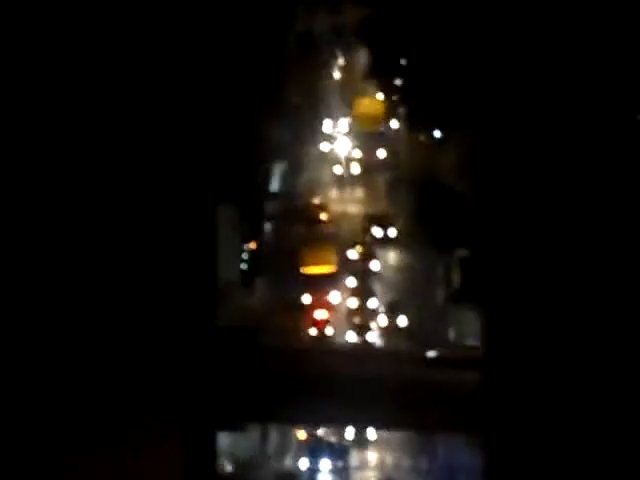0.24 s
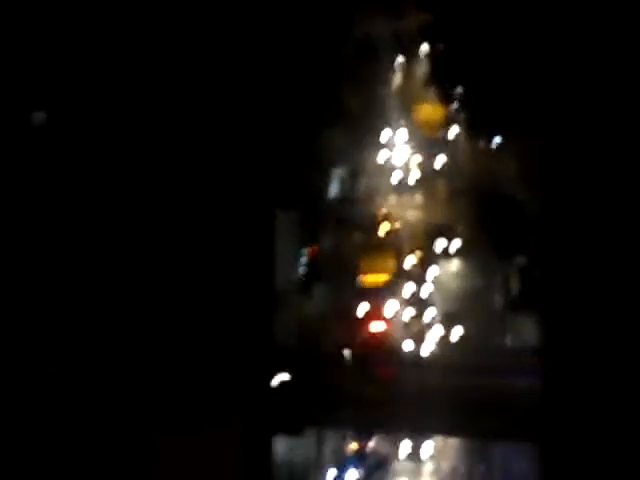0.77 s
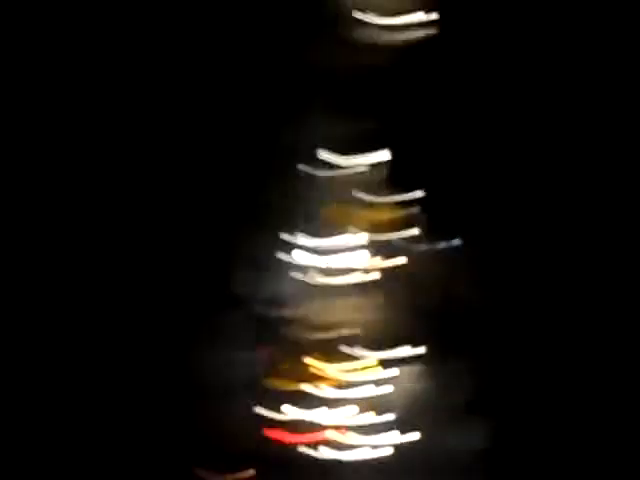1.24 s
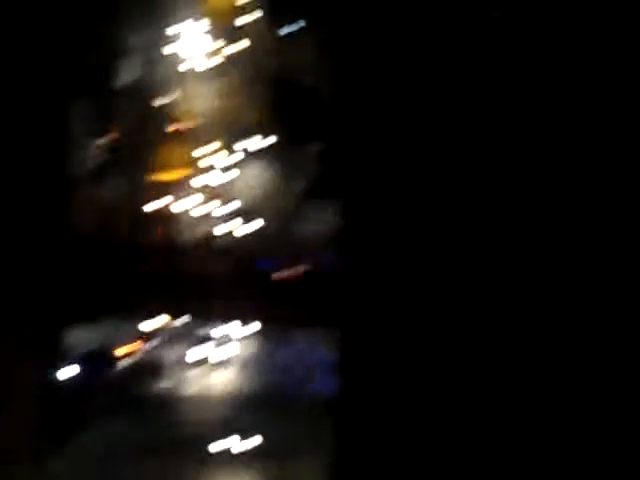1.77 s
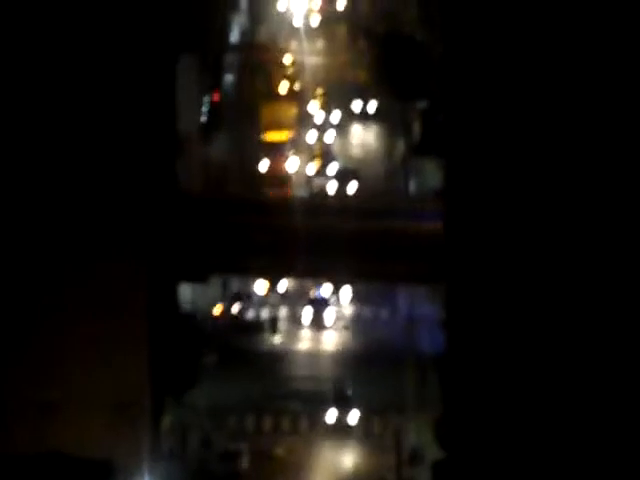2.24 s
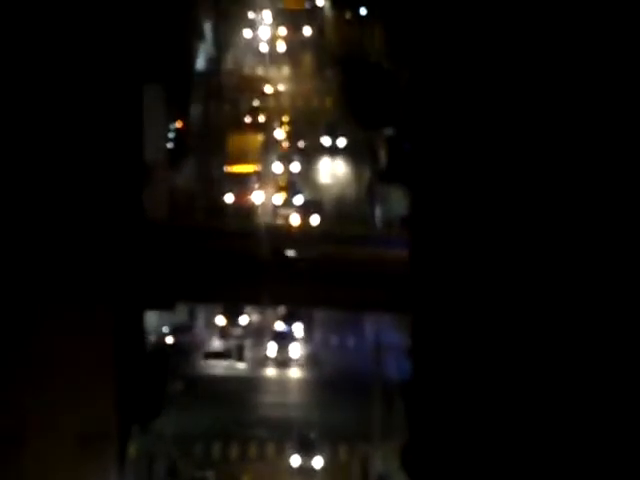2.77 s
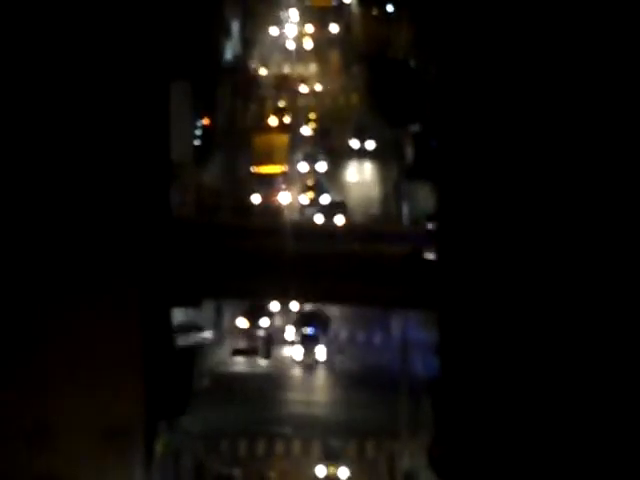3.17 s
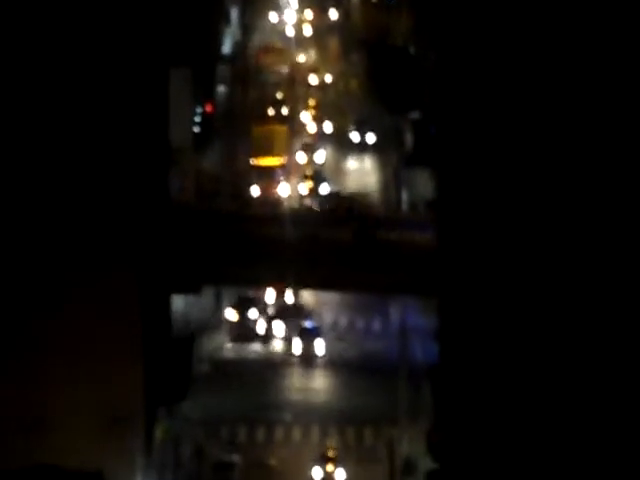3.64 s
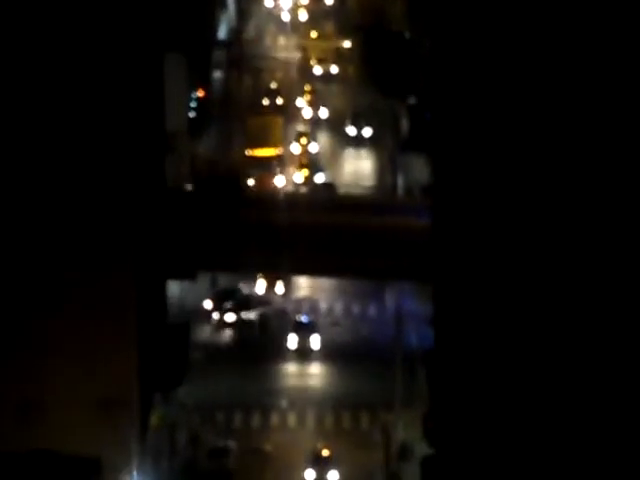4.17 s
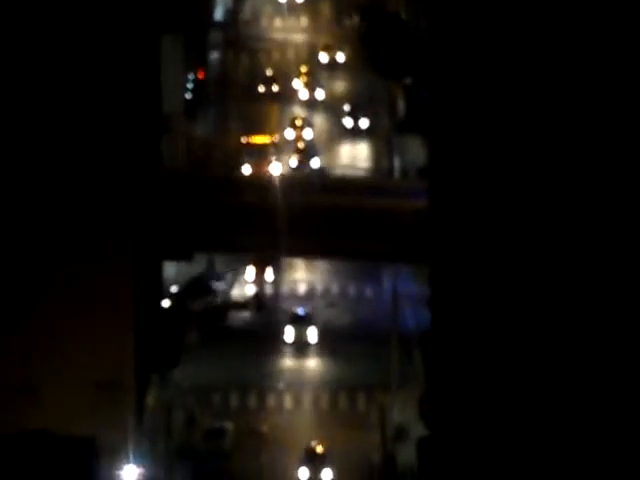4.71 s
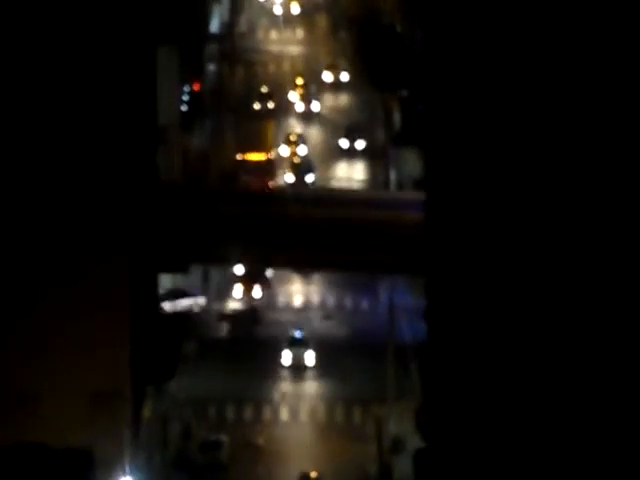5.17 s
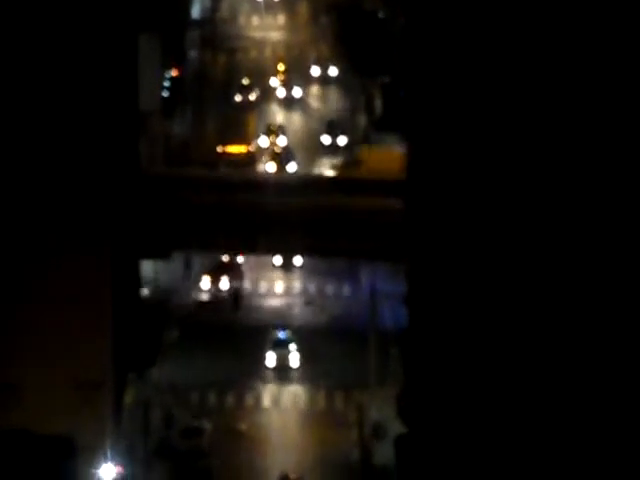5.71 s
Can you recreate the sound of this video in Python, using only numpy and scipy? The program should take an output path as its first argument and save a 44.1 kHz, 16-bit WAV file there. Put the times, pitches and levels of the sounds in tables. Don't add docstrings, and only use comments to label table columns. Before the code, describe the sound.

A hand thumps and jostles the camera for two seconds, then far-off traffic rumbles softly below with occasional clicks and knocks.

```python
import sys
import numpy as np
from scipy import signal
from scipy.fft import rfft, irfft, next_fast_len
from scipy.io import wavfile
from scipy.ndimage import uniform_filter1d, map_coordinates

SR = 44100
rng = np.random.default_rng(int(sys.argv[2]) if len(sys.argv) > 2 else 0)


def generate_wav(sig):
    pcm = np.round(np.clip(np.atleast_2d(sig).T, -1, 1) * 32767).astype(np.int16)
    wavfile.write(sys.argv[1], SR, pcm)


def boost(x):
    u = np.asarray(x, float) / 20
    return 10 ** u


N = 261938

# pitch_hz, level_db (per Hz)
SWAY_SPECTRUM = [(1, -44), (3, -4.5), (12, 4.5), (22, 2), (40, -15.5), (70, -11.5), (140, -120)]
# pitch_hz, level_db (per Hz)
RUMBLE_SPECTRUM = [(12, -30), (22, -3), (32, -1), (46, -3), (70, -4), (100, -5), (160, -11), (220, -28),
                   (370, -120)]
# pitch_hz, level_db (per Hz)
BODY_SPECTRUM = [(70, -34), (140, -2.5), (220, -7.5), (330, -10.5), (420, -11.5), (600, -23.5),
                 (1000, -48.5), (2000, -120)]
# pitch_hz, level_db (per Hz)
TYRE_SPECTRUM = [(350, -15), (600, -2.5), (826, 1.5), (1070, -4.5), (1160, -5), (1900, -14.5),
                 (2500, -22.5), (5000, -35.5), (6500, -99), (11000, -120)]
# pitch_hz, level_db, width_hz
ENGINE_DRONES = [
    (60.6, -37.5, 11.8),
    (90, -42, 13.5),
    (152.8, -49, 18),
    (268.5, -50, 36.5),
    (547.8, -60.5, 12),
]
# time_s, level_db
STREET_LEVEL = [(0, -3), (.3, -6.5), (.8, -3.5), (1.2, -10.5), (1.45, -7), (1.8, -9.5), (2.05, -8.5),
                (2.45, 0), (2.8, -2), (3.1, 0.5), (3.4, -0.5), (4.35, 0), (4.75, 2.5), (5, 0.4), (5.3, 0.3),
                (5.6, 0.1), (5.94, -0.5)]
# time_s, sway_db, tremor_db
HAND_LEVEL = [(0, -22.5, -31), (.5, -18.5, -37.5), (.87, -32, -35), (1, -40, -25.5), (1.2, -6, -26.5),
              (1.45, -20, -28.5), (1.75, -16.5, -63), (2, -15.5, -28), (2.3, -19.5, -41), (2.8, -30, -38.5),
              (3.25, -26.5, -33), (3.65, -32.5, -53), (5.94, -36, -35)]
# pitch_hz, level_db (per Hz)
HISS_SPECTRUM = [(1760, 2.5), (3000, 1.5), (5350, -1.5), (5730, -1.5), (6630, -2.5), (15600, -5.5)]
# start_s, end_s, level_db, pitch_hz, width_hz
RUBS = [(1.572, 1.6, -44, 1700, 3400), (1.6, 1.66, -53, 2100, 2600), (1.696, 1.805, -46.5, 2480, 140),
        (1.765, 1.81, -52, 2700, 300), (1.742, 1.805, -54, 8100, 3000), (1.73, 1.805, -54, 4000, 2900),
        (1.943, 1.995, -35.5, 1200, 1300), (2.179, 2.262, -35.5, 1030, 760), (2.186, 2.25, -50, 2700, 1200),
        (2.186, 2.245, -60, 4500, 1200), (0, 1.2, -64, 1900, 1500), (1.98, 2.16, -52, 1200, 1600),
        (4.62, 4.9, -34, 110, 9.4), (4.5, 4.58, -47, 1900, 290), (4.58, 4.7, -49.5, 1860, 530),
        (4.451, 4.717, -60, 3300, 3000)]
# time_s, pressure (signed, full scale 1), width_ms
SHOVES = [(0.038, 0.13, 4.2), (0.06, -0.38, 17), (0.112, 0.25, 24), (0.175, 0.25, 20), (0.255, -0.24, 16),
          (0.376, 0.165, 43), (0.829, -0.26, 12.4), (0.869, 0.31, 8.9), (0.919, -0.76, 15),
          (0.957, 0.51, 64), (1.021, -1.03, 18), (1.059, 0.69, 52), (1.113, -1.68, 22.3),
          (1.146, 1.8, 23.7), (1.27, -0.62, 40), (1.309, -0.54, 23), (1.362, -0.73, 25), (1.412, 0.99, 30),
          (1.447, -0.36, 26), (1.478, 0.72, 15.5), (1.511, 0.6, 34), (1.545, -0.35, 35),
          (1.622, -0.85, 33.3), (1.662, 0.4, 51), (1.708, -0.52, 20.7), (1.87, 0.36, 29),
          (1.893, 1.08, 13.1), (1.914, -1.1, 25.6), (1.935, -0.23, 28)]
# time_s, pressure (signed, full scale 1), width_ms
KNOCKS = [(0.159, -0.17, 3.3), (.426, 0.037, 1.25), (0.454, -0.14, 4.1), (0.914, -0.097, 1.6),
          (0.937, -0.28, 3), (0.989, -0.51, 6.9), (1.053, -.2, 3.1), (1.1037, 0.23, 1.12),
          (1.108, -0.58, 1.7), (1.284, 0.14, 1.56), (1.459, -0.41, 5.9), (1.4837, 0.2, 1.6),
          (1.5314, 0.13, 1.2), (1.588, 0.063, 1.04), (1.8905, 0.067, 1.6), (2.047, 0.052, 0.83),
          (2.122, 0.03, 0.81), (2.197, 0.14, 4.2), (2.441, 0.1, 1.3), (2.555, -0.094, 1.2),
          (2.562, 0.2, 5.4), (2.577, 0.088, 2.1), (3.111, 0.11, 7.6), (3.461, -0.17, 3.1),
          (3.466, 0.17, 1.7), (4.2886, 0.18, 2.1), (4.3048, 0.23, 1.85), (5.3271, -0.072, 1.54),
          (5.423, -0.13, 2.5), (5.456, -0.24, 2.3)]
# start_s, length_ms, level_db, pitch_hz
FINGERTIP_TAPS = [(.218, 6.9, -42.5, 645), (.224, 11, -59, 2260), (.423, 5.7, -42.5, 564),
                  (1.103, 9, -43, 450), (1.826, 10, -57, 1810), (2.04, 4.2, -43.5, 1240),
                  (2.048, 6, -50, 890), (2.1195, 5.1, -53, 990), (2.274, 4.4, -45, 1270),
                  (2.308, 6.6, -40.5, 1240), (2.343, 7.2, -50.5, 1500), (2.4182, 5.9, -44, 1210),
                  (2.435, 9.8, -44, 1230), (2.556, 4.8, -51, 2440), (2.61, 3.35, -47, 1090),
                  (3.107, 9.8, -42, 1270), (3.46, 9.6, -44.5, 1440), (3.46, 9.3, -45, 2350),
                  (4.5699, 5.6, -50, 850), (2.1766, 6.2, -42, 1250), (1.108, 7.9, -42, 1300)]
# start_s, length_ms, level_db, pitch_hz
FINGERNAIL_TAPS = [
    (0.2133, 6.2, -48, 1790),
    (1.4578, 4.5, -42, 1140),
    (1.482, 1.6, -37.5, 910),
    (1.5178, 3.5, -43, 2160),
    (1.584, 11, -48, 1210),
    (2.553, 10.4, -43, 1270),
    (2.556, 4.7, -55, 4300),
    (3.103, 6.2, -45, 1200),
    (3.107, 12, -45.5, 2250),
    (3.129, 22, -54.5, 2000),
]
# start_s, length_ms, level_db, pitch_hz
KNUCKLE_THUDS = [
    (3.464, 11, -27.5, 274),
    (3.466, 6.6, -36, 544),
    (3.459, 4.1, -49, 4480),
]
# time_s, depth_db, hold_s
GAIN_DUCKS = [
    (0.893, 3.5, .15),
    (1.033, 2.44, 0.17),
    (1.099, 9, 0.14),
    (1.404, 2, 0.062),
    (1.503, 1.6, 0.14),
    (1.924, 7.5, 0.049),
]
# first_s, steps, gap_blocks, step_db
GAIN_CLIMBS = [(.9444, 1, 1, .12), (.956, 1, 1, .3), (.9908, 2, 5, .3), (1.0837, 1, 1, .15),
               (1.1069, 1, 1, .5), (1.2114, 1, 1, .3), (1.2695, 6, 1, .4), (1.3508, 2, 2, .25),
               (1.3972, 1, 1, .5), (1.4785, 1, 1, .15), (1.5017, 2, 1, .3), (1.6062, 3, 1, .2),
               (1.6526, 3, 1, .13), (1.7107, 1, 1, .12), (1.7919, 3, 2, .4), (1.8732, 2, 5, .25)]
# start_s, length_ms, level_db
OVERLOADS = [
    (0.9145, 4.8, -39.5),
    (1.02, 2.2, -38.5),
    (1.057, 5.4, -39),
    (1.1091, 5.3, -41),
    (1.413, 2.9, -43.5),
    (1.891, 1.8, -38.5),
    (1.906, 10.6, -39.5),
]

RUMBLE_DB, BODY_DB, TYRES_DB = -32, -40.5, -55
RUMBLE_FOLLOWS, BODY_FOLLOWS, TYRES_FOLLOWS = 0.45, 1.05, 0.91
SPEEDUP_S, SPEEDUP_DB_PER_S = 4.5, 0.9
FRAME_HZ, ROW_HZ = 29.97, 1164
PAD, NAIL, THUD = (0.48, -29), (0.59, -17.5), (0.12, -45)  # (width over pitch, treble dB at 1 kHz and 5 ms)
TREBLE_DB_PER_OCTAVE, TREBLE_DB_PER_DOUBLING = -0.5, -9.5
REST_DB, ATTACK_S, QUICK_S, SLOW_S, SLOW_SHARE = 1.13, 0.045, 0.0757, 0.61, 0.32
BLOCK_S = 512 / 44100
RAIL = 0.72
TOP_HZ = 15740


def unit(x):
    return x / np.sqrt(np.mean(x ** 2) + 1e-20)


def curves(rows):
    s, *columns = np.transpose(rows)
    return [np.interp(np.arange(N) / SR, s, column) for column in columns]


def wobble(rate):
    knots = rng.standard_normal(int(N * rate / SR) + 4)
    return map_coordinates(knots, [np.arange(N) * rate / SR])


def filtered(x, response):
    m = next_fast_len(len(x) + 8192)
    return irfft(rfft(x, m) * response(np.fft.rfftfreq(m, 1 / SR)), m)[:len(x)]


def peak(hz, width_hz):
    return lambda f: 1j * f * width_hz / (hz * hz - f * f + 1j * f * width_hz)


def rush(spectrum, patchy_db):
    z = signal.stft(rng.standard_normal(N), nperseg=512)[2]
    field = uniform_filter1d(rng.standard_normal(z.shape), size=4, axis=0)
    field = uniform_filter1d(field, size=12, axis=1)
    x = signal.istft(z * boost(patchy_db * unit(field)), nperseg=512)[1][:N]
    f, db = np.transpose(spectrum)
    return unit(filtered(x, lambda hz: boost(np.interp(np.log(hz + 0.1), np.log(f), db))))


def add(track, s, sound):
    part = track[round(s * SR):][:len(sound)]
    part += sound[:len(part)]


def traffic():
    street_db, = curves(STREET_LEVEL)
    sway_db, tremor_db = curves(HAND_LEVEL)
    low = np.hypot(boost(RUMBLE_DB + RUMBLE_FOLLOWS * street_db), boost(tremor_db))
    faster_db = SPEEDUP_DB_PER_S * np.maximum(np.arange(N) / SR - SPEEDUP_S, 0)
    body_db = BODY_DB + BODY_FOLLOWS * street_db - faster_db
    tyre_db = TYRES_DB + TYRES_FOLLOWS * street_db + faster_db
    gust = wobble(3.74)
    x = boost(sway_db) * rush(SWAY_SPECTRUM, patchy_db=1.5)
    x = x + low * boost(0.56 * gust + 0.13 * wobble(13)) * rush(RUMBLE_SPECTRUM, patchy_db=1.8)
    x = x + boost(body_db + 1.52 * gust + 1.0 * wobble(42)) * rush(BODY_SPECTRUM, patchy_db=0.57)
    x = x + boost(tyre_db + 0.13 * gust + 1.03 * wobble(12)) * rush(TYRE_SPECTRUM, patchy_db=-0.16)
    for hz, db, width_hz in ENGINE_DRONES:
        drone = unit(filtered(rng.standard_normal(N), lambda f: peak(hz, width_hz)(f) ** 2))
        x = x + boost(db + body_db - BODY_DB + 1.78 * wobble(1.853)) * drone
    return x


def electronics():
    t = np.arange(N) / SR
    frame, phase = np.divmod(t * FRAME_HZ, 1)
    reading = np.clip((0.16 - abs(phase - 0.325)) / 0.055, 0, 1)
    start = rng.uniform(0, 1, int(frame[-1]) + 1)[frame.astype(int)]
    clock = sum(np.cos(2 * np.pi * k * (ROW_HZ * t + start)) for k in range(4, 14))
    hiss = rush(HISS_SPECTRUM, patchy_db=1.15)
    return boost(-66) * hiss + boost(-78) * reading * clock


def rubs():
    x = np.zeros(N)
    for start, end, db, hz, width_hz in RUBS:
        n = round((end - start) * SR)
        clump_db = 3 * min(width_hz / 600, 1)
        clumps = boost(clump_db * wobble(150)[:n])
        grit = filtered(rng.standard_normal(n) * clumps, lambda f: peak(hz, width_hz)(f) ** 2)
        add(x, start, boost(db - 14) * unit(grit) * np.hanning(n) ** 0.2)
    return x


def pushes():
    lead = 4410
    t = np.arange(-lead, lead) / SR
    x = np.zeros(N + lead)
    for s, size, ms in SHOVES + KNOCKS:
        add(x, s, size * np.exp(-np.log(16) * (t / (ms / 1000)) ** 2))
    return x[lead:]


def taps():
    x = np.zeros(N)
    kinds = (FINGERTIP_TAPS, PAD), (FINGERNAIL_TAPS, NAIL), (KNUCKLE_THUDS, THUD)
    touches = [row + kind for rows, kind in kinds for row in rows]
    for s, ms, db, hz, broad, bright_db in touches:
        treble_db = bright_db + TREBLE_DB_PER_OCTAVE * np.log2(hz / 1000)
        treble_db = treble_db + TREBLE_DB_PER_DOUBLING * np.log2(ms / 5)
        grit = rng.standard_normal((2, 1600))
        u = np.arange(1600) / SR / (ms / 1000)
        stroke = abs(np.sin(np.pi * np.clip(u, 0, 1) ** 0.7)) ** 0.8
        ring = unit(filtered(grit[0] * stroke, lambda f: peak(hz, broad * hz)(f) ** 2))
        tick = unit(filtered(grit[1] * stroke * boost(-12 * u), lambda f: peak(4800, 2500)(f) ** 2))
        add(x, s, boost(db - 4.0) / np.sqrt(u[-1]) * (ring + boost(treble_db) * tick))
    return x


def scene():
    return (traffic() + pushes() + taps() + rubs())[None]


def gain_control():
    t = np.arange(N) / SR
    gain_db = np.full(N, float(REST_DB))
    for s, depth_db, hold_s in GAIN_DUCKS:
        since = np.maximum(t - s - ATTACK_S - hold_s, 0)
        left = (1 - SLOW_SHARE) * np.exp(-since / QUICK_S) + SLOW_SHARE * np.exp(-since / SLOW_S)
        gain_db = gain_db - depth_db * np.clip((t - s) / ATTACK_S, 0, 1) * left
    melt = 1.44 * np.exp(-np.arange(6000) / SR / 0.0077)
    for first, steps, apart, step_db in GAIN_CLIMBS:
        for k in range(steps):
            add(gain_db, first + k * apart * BLOCK_S, step_db * melt)
    return boost(gain_db)


def chatter():
    x = np.zeros(N)
    for s, ms, db in OVERLOADS:
        chance, size = rng.uniform(0, 1, (2, 600))
        jump = chance < 0.06
        steps = jump * (size + 0.69) * (-1.) ** np.cumsum(jump)
        steps[0] = 1
        add(x, s, boost(db - 8.5) * unit(steps[:round(ms * SR / 1000)]))
    return signal.lfilter([1], [1, -0.9], x)


def band_limit(x):
    return signal.sosfilt(signal.butter(12, 15720, fs=SR, output="sos"), x)


def record(dry):
    x = (dry[0] + electronics()) * gain_control()
    x = np.clip(x, -RAIL, RAIL) + chatter()
    x = filtered(x, lambda hz: hz < TOP_HZ)
    return band_limit(x[None])


dry = scene()
out = record(dry)
generate_wav(out)
```